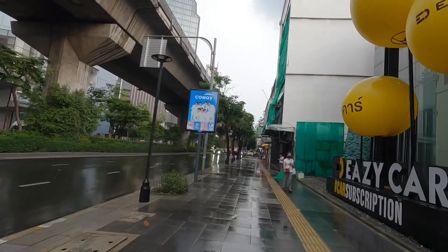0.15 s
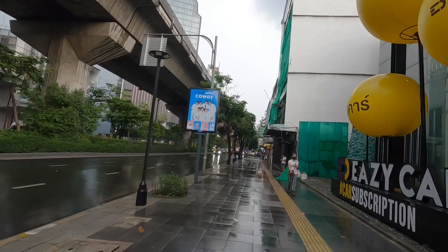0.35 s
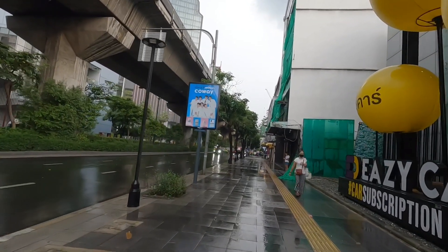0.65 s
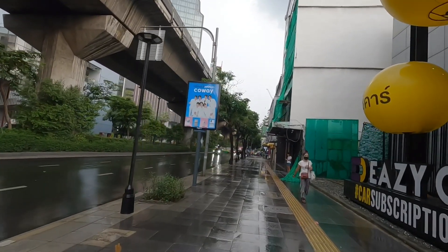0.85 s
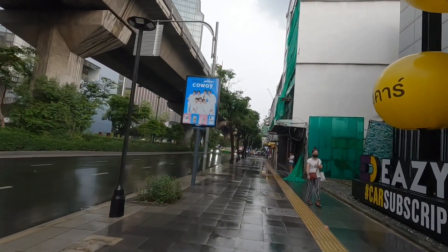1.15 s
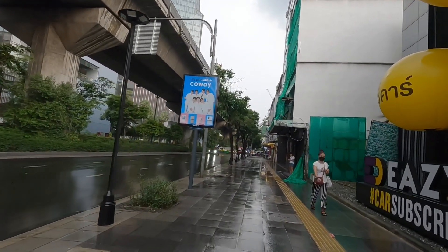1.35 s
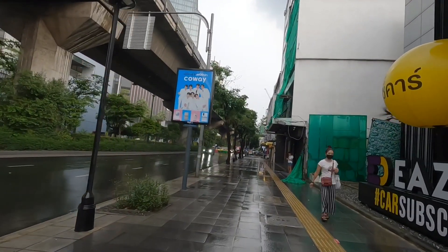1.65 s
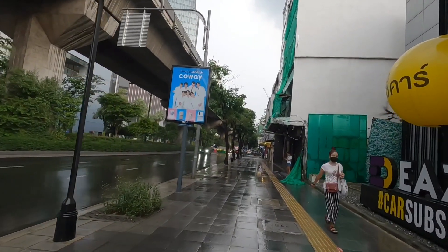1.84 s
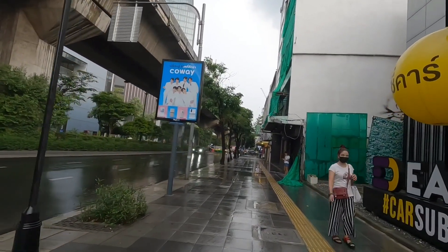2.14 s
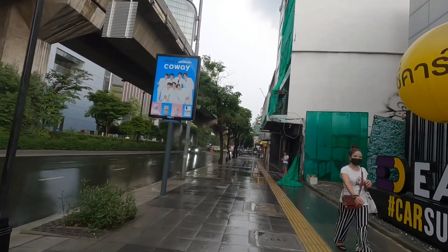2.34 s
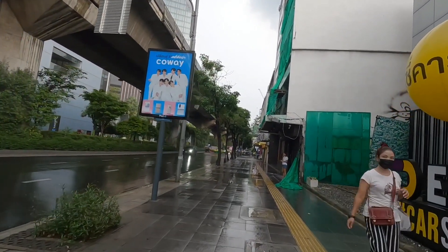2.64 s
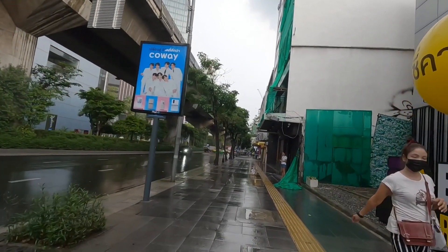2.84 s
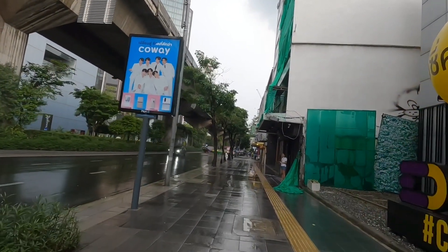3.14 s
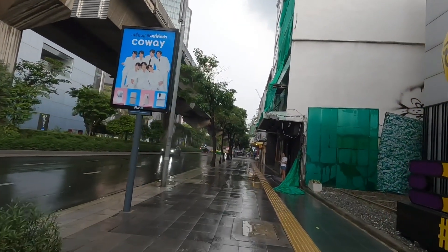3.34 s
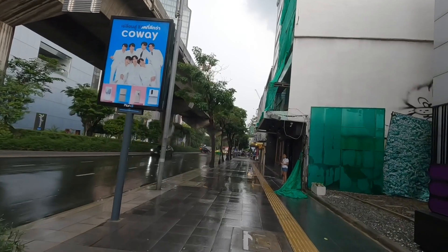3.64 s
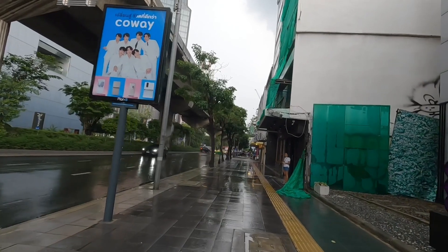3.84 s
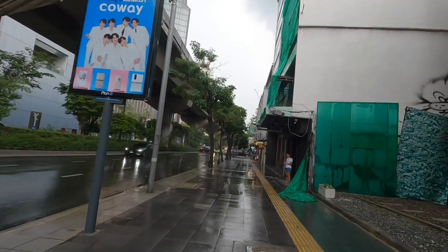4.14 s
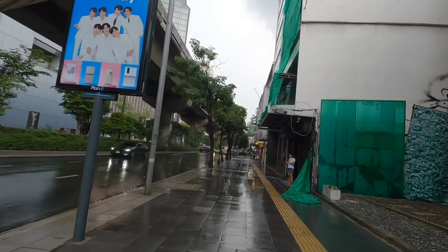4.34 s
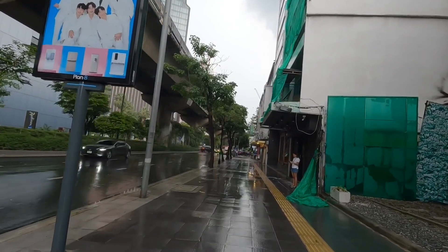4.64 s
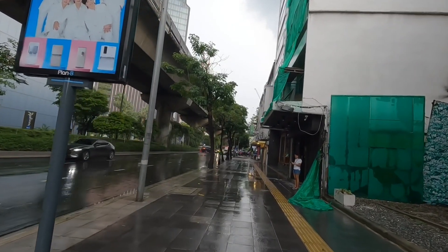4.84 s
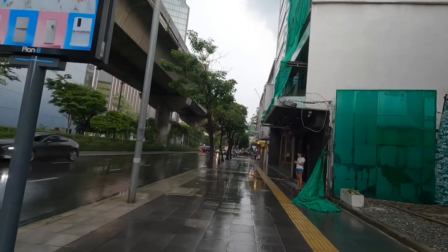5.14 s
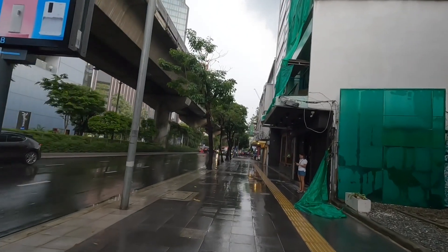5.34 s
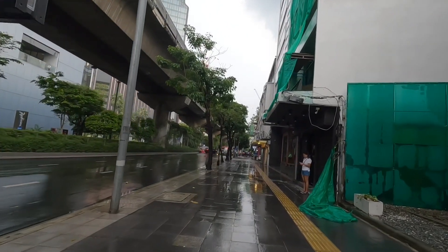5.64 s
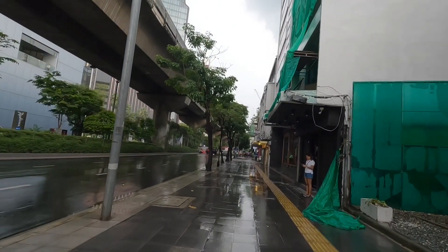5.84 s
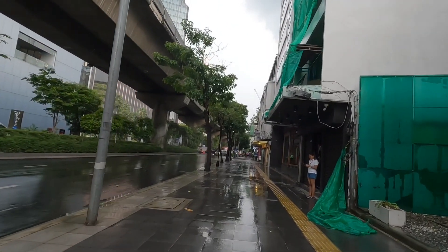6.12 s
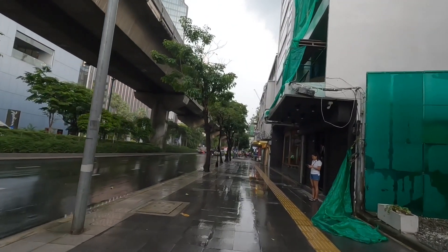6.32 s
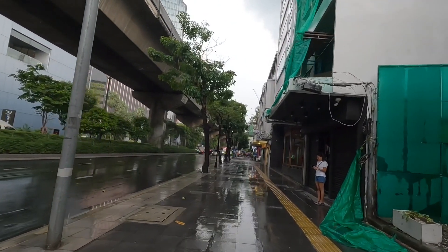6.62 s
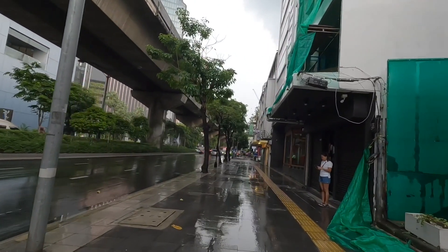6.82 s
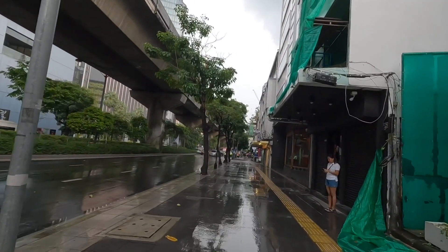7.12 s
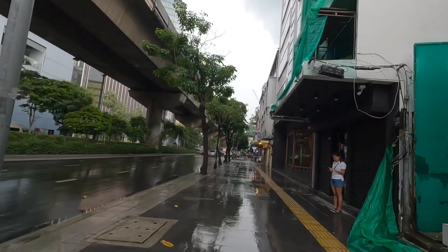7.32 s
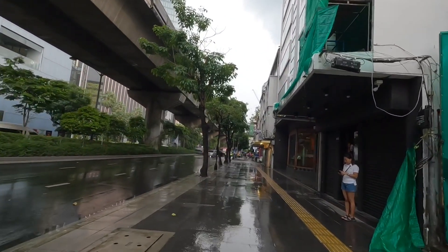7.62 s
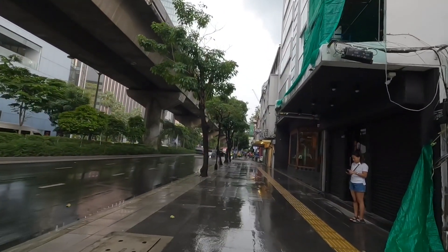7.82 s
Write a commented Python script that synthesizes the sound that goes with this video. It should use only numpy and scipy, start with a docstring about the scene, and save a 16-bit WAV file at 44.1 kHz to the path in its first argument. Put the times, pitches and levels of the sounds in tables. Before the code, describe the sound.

A wet city street, heard from the pavement on a small stereo camera microphone. A big engine drones steadily, with a low, buzzing, fluttering tone around 135 Hz; it surges at 0.1 and 0.8 seconds, again between 2.2 and 3.5, more weakly from 4.1 to 5.6, and strongest from 6.3 to the end at 8. A farther engine wavers slightly higher, swelling around 3.4, 4.3 and 6, then vanishing by about 6.3. Beneath lies deep traffic rumble. Cars pass at about 0, 2.3, 3.4, 4.1, 4.6, 5.5, 6.3, 6.8 and 8, each a soft tyre roar with watery spray and faint hiss. At 3.2 to 3.4 a faint high brake squeak stutters and sinks slightly. Low wind puffs bump the microphone from 2.2 to 4.6, strongest after 4. The stereo is widest around 3.3 to 4.2, narrow around 5.3 to 6.7, and widens again at the end.

```python
"""A big engine drones and surges over a wet city street: wavering sines at multiples of one cycle rate.
A farther engine is a single wavering tone. Shaped noise makes the traffic: rumble and growl below,
tyre roar, tread, spray and a faint hiss above, swelling as cars pass. Puffs of low noise are wind on the
microphone; a brake squeaks in a few short sine bursts. The picture drifts between nearly mono and stereo."""
import sys
import numpy as np
from scipy import signal
from scipy.io import wavfile
from scipy.ndimage import uniform_filter1d

SR = 44100
rng = np.random.default_rng(int(sys.argv[2]) if len(sys.argv) > 2 else 0)


def waveform_to_disk(signal):
    """Save audio, clipped to [-1, 1], as 16-bit WAV at the path in sys.argv[1]."""
    frames = np.transpose(np.atleast_2d(signal))
    scaled = np.clip(frames, -1, 1) * 32767
    samples = np.round(scaled).astype(np.int16)
    wavfile.write(sys.argv[1], SR, samples)


def amplitude_ratio(level_db):
    """Convert a level in decibels to the matching linear amplitude (field) ratio."""
    exponent = np.asarray(level_db, float) / 20
    return 10 ** exponent


N = 351466  # length in samples


def evened(x):
    """Scales to rms 1."""
    return x / np.sqrt(np.mean(x ** 2) + 1e-20)


def read(points, hz):
    """Reads a spectrum on a log-frequency axis."""
    f, value = np.transpose(points)
    return np.interp(np.log(hz + 1), np.log(f + 1), value)


def wander(length, hz):
    """Smoothed chance of rms about 1: white steps through a one-pole low-pass with its corner near hz."""
    step_rate = 40  # Hz
    steps = rng.standard_normal(int(length * step_rate / SR) + 50)
    smooth = signal.lfilter([1], [1, -np.exp(-2 * np.pi * hz / step_rate)], steps)
    return np.interp(np.arange(length) * step_rate / SR, np.arange(len(steps)), evened(smooth))


def swells(rows, rest_db):
    """Level in dB of bell-shaped swells whose power adds to a resting level."""
    t = np.arange(N) / SR
    bells = sum(amplitude_ratio(db) ** 2 * np.exp(-2 * ((t - s) / half) ** 2) for s, half, db in rows)
    return 10 * np.log10(amplitude_ratio(rest_db) ** 2 + bells)


def tone(hz, db, rough_db, rough_hz, waver=0.00602):
    """A sine whose level and pitch flutter, as echoes from the walls add and cancel."""
    fluttering_hz = hz * (1 + waver * wander(len(hz), rough_hz))
    turns = np.cumsum(fluttering_hz) / SR + rng.random()
    level = np.sqrt(2) * amplitude_ratio(db + rough_db * wander(len(hz), rough_hz))
    return level * np.sin(2 * np.pi * turns)


# The engine pulls: start t/s, length/s, firing level/dB at the start, firing level/dB at the end
PULLS = [(0.077, 0.58, -23.5, -18.5), (0.752, .2, -15.5, -20), (2.236, 0.19, -21.5, -21),
         (2.44, 0.56, -18, -18.5), (3.095, 0.435, -23.5, -24.5), (4.123, 0.19, -26.5, -25.5),
         (4.407, .35, -23, -24), (5.307, 0.33, -30.5, -24), (6.263, 0.87, -17.5, -14.5),
         (7.23, 0.63, -20, -14)]
IDLE_DB, PULL_RISE_S, PULL_FALL_S = -29.5, 0.036, 0.1


def load():
    """Firing level in dB: each pull sets in quickly, holds and lets go."""
    t = np.arange(N) / SR
    power = amplitude_ratio(IDLE_DB) ** 2
    for s, length, start_db, end_db in PULLS:
        held = amplitude_ratio(np.interp(t, [s, s + length], [start_db, end_db]))
        rise = np.clip((t - s) / PULL_RISE_S, 0, 1)
        fall = np.exp(-np.maximum(t - s - length, 0) / PULL_FALL_S)
        power = power + (held * rise * fall) ** 2
    return 10 * np.log10(power)


# Big engine speed: t/s, cycle rate f/Hz
ENGINE = [(0.0, 45.03), (0.351, 44.96), (0.84, 46.43), (1.499, 45.02), (2.22, 45.95), (2.48, 44.9),
          (2.949, 45.7), (3.51, 47.24), (3.86, 46.53), (4.11, 49.97), (4.46, 48.62), (4.7, 46.63),
          (5.59, 44.8), (6.15, 47), (6.352, 45.24), (6.8, 44.18), (7.3, 45.28), (7.75, 46.78), (7.97, 46.1)]
# Partials around the firing tone: multiple of the cycle rate, level/dB against the firing level
LOW_ORDERS = [(2, -16), (3, -1), (4, -16), (5, -28)]
# Partials around the firing tone's octave: multiple of the cycle rate, level/dB against the octave level
MID_ORDERS = [(6, -1.5), (7, -6.5)]
# Upper partials: multiple of the cycle rate, level/dB against the eighth multiple's level
HIGH_ORDERS = [(8, -1), (9, -7)]
# The octave swells: t/s, half length/s, level/dB
OCTAVE_SWELLS = [(.1, 0.7, -32), (2.9, 0.43, -37), (3.5, 0.3, -33), (4.65, 0.37, -30.5), (5.5, 0.39, -37),
                 (6.4, 0.1807, -32.5), (6.85, .15, -38), (7.65, 0.37, -31.5)]
# The eighth multiple swells: t/s, half length/s, level/dB
EIGHTH_SWELLS = [(4.3, 0.28, -49), (6.35, 0.14, -33), (6.75, .3, -38), (7.15, 0.14, -39), (7.6, .2, -37),
                 (7.9, 0.22, -31)]
OCTAVE_REST_DB, EIGHTH_REST_DB = -47, -47


def engine():
    """Multiples of one cycle rate; the third, the firing tone, stands out clean under load."""
    hz = np.interp(np.arange(N) / SR, *np.transpose(ENGINE))
    firing_db = load()
    octave_db = swells(OCTAVE_SWELLS, OCTAVE_REST_DB)
    eighth_db = swells(EIGHTH_SWELLS, EIGHTH_REST_DB)
    slack = np.clip((-17 - firing_db) / 9, 0, 1)  # off load the firing grows uneven
    low = sum(tone(k * hz, firing_db + db, rough_db=2.5 + 2.6 * slack, rough_hz=9.2,
                   waver=0.0049 + 0.012 * slack) for k, db in LOW_ORDERS)
    mid = sum(tone(k * hz, octave_db + db, rough_db=3.0 + 0.83 * slack, rough_hz=9.36,
                   waver=0.00664 + 0.00778 * slack) for k, db in MID_ORDERS)
    high = sum(tone(k * hz, eighth_db + db, rough_db=2.0 + 1.4 * slack, rough_hz=8.92,
                    waver=0.0056 + 0.00836 * slack) for k, db in HIGH_ORDERS)
    return low + mid + high


# A second, farther engine swells: t/s, half length/s, level/dB
FAR_SWELLS = [(.7, 0.26, -33.5), (1.5, 0.19, -37.5), (2.35, .25, -35), (3.35, 0.28, -30.5),
              (4.25, 0.43, -28.5), (4.9, 0.17, -32.5), (5.45, .15, -36.5), (5.95, 0.3, -28)]
FAR_HZ, FAR_REST_DB, FAR_GONE_S = 187, -46, 6.3


def far_engine():
    """One wavering tone that swells and, near the end, quickly fades out for good."""
    heard = np.clip((FAR_GONE_S - np.arange(N) / SR) / 0.1, 0, 1)
    hz = FAR_HZ * (1 + 0.01476 * wander(N, 1.41))
    return heard * tone(hz, swells(FAR_SWELLS, FAR_REST_DB), rough_db=3.5, rough_hz=11, waver=0.017)


# Left-right difference against the sum, in full stereo: f/Hz, level/dB
SIDE_DB = [(60, -20.5), (200, -22.5), (640, -11.5), (1400, -9.5), (3100, -5.5), (6800, -2.5), (10000, 0.5),
           (12000, -6.5), (15000, 3.5)]
# The road lies to the left: f/Hz, likeness of difference and sum [0 to 1]
LEAN = [(60, .15), (700, .45), (3000, .35), (6000, .4), (10000, .55), (12000, .05)]


def noise(spectrum, patchy_db, flicker_db):
    """Sum and difference of the two sides: random short-time spectra, drifting patches, shared flicker."""
    frames, hz = N // 256 + 6, np.fft.rfftfreq(1024, 1 / SR)
    a, b, c, d, patches = rng.standard_normal((frames, 513, 5)).T
    patches = uniform_filter1d(patches, size=12, axis=0)  # smooth over frequency
    patches = evened(uniform_filter1d(patches, size=14, axis=1))  # smooth over time
    flicker = evened(uniform_filter1d(rng.standard_normal(frames), size=3))
    lean = np.clip(read(LEAN, hz), -1, 1)[:, None]
    mid, unrelated = a + 1j * b, c + 1j * d
    side = amplitude_ratio(read(SIDE_DB, hz))[:, None] * (lean * mid + np.sqrt(1 - lean ** 2) * unrelated)
    level_db = read(spectrum, hz)[:, None] + patchy_db * patches + flicker_db * flicker
    out = signal.istft(np.array([mid, side]) * amplitude_ratio(level_db), nperseg=1024, noverlap=768)[1][:, :N]
    return out / np.sqrt(np.mean(out[0] ** 2))  # the sum gets rms 1


# Cars passing: nearest t/s, approach/s, leaving/s, tyre roar level/dB, spray level/dB
PASSES = [(0, .3, 0.9, -38.5, -49.5), (2.25, 0.63, 0.37, -37.5, -48.5), (3.36, 0.75, 0.29, -42.5, -46),
          (4.08, 0.42, 0.2, -38.5, -41), (4.6, 0.57, 0.5, -38, -61), (5.05, 0.18, 0.22, -42, -52.5),
          (5.499, 0.45, 0.49, -36, -41.5), (6.25, 0.44, 0.55, -36.5, -42), (6.8, 0.41, 0.082, -40.5, -46.5),
          (8.0, 0.4, .3, -39.5, -45.5)]
FALL_OFF = 1.27  # walls and parked cars shade a car, so it fades faster than the plain distance law (1)


def passing(column, far_db, leaving=1):
    """Level in dB of all cars: power falls with distance, before and after each pass."""
    t = np.arange(N) / SR
    power = amplitude_ratio(far_db) ** 2
    for row in PASSES:
        scale_s = np.where(t < row[0], row[1], leaving * row[2])
        power = power + amplitude_ratio(row[column]) ** 2 / (1 + ((t - row[0]) / scale_s) ** 2) ** FALL_OFF
    return 10 * np.log10(power)


# Spectra of the traffic layers, each f/Hz, relative level/dB per Hz:
# deep rumble and growl of engines
RUMBLE = [(15, -7), (25, 15.5), (45, 10.5), (75, 9), (110, 13), (150, 0), (220, -9.5), (600, -84.5)]
GROWL = [(100, -3.5), (160, -3), (200, 5), (300, 1.5), (400, -4.5), (430, -8), (500, -17), (1500, -67.5)]
# tyre roar, and air pumped in the tread of a near tyre
ROAR = [(250, -37), (450, -2), (700, -1), (1000, -3), (1500, -7), (2200, -12), (3500, -17.5), (9000, -52)]
TREAD = [(500, -39), (800, 1), (1000, 6), (1250, -3.5), (2000, -26), (4000, -69)]
# water thrown by the tyres
SPRAY = [(800, -16), (2000, -2), (3000, -3.5), (5000, -4.5), (7700, -9), (8500, -14.5), (9700, -25.5),
         (14000, -53)]
# a faint top hiss, differing per side
TOP_HISS = [(7000, -28), (9500, -3), (11500, -2), (13000, -11), (14800, -23), (15600, -27.5)]
# The deep rumble's slow rises and falls, weaker towards the end: t/s, half length/s, level/dB
RUMBLE_SWELLS = [(.1, 1, -21), (1.3, 0.94, -21.5), (2.4, 0.52, -23), (3.2, 0.42, -24.5), (4.1, 1, -22),
                 (5.2, 0.99, -23), (6.4, 0.76, -24.5), (7.3, 0.24, -25.5)]
RUMBLE_REST_DB = -25.5
FAR_ROAR_DB, FAR_SPRAY_DB = -37.5, -52  # tyres far down the street


def traffic():
    """Broad layers of noise: engines far off below, tyres on wet asphalt above, a faint hiss on top."""
    roar_db = passing(column=3, far_db=FAR_ROAR_DB)
    spray_db = passing(column=4, far_db=FAR_SPRAY_DB)
    # the top hiss follows the spray level more steeply and falls sooner
    hiss_db = -66.5 + 1.1 * (passing(column=4, far_db=FAR_SPRAY_DB, leaving=0.6) + 45)
    # the tread note grows faster than the roar as a car comes near
    tread_db = -43.0 + 4.5 * (roar_db + 34)
    rumble_db = swells(RUMBLE_SWELLS, RUMBLE_REST_DB)
    # exhausts come near with the tyres, with a slight drift of their own
    growl_db = -30 + (roar_db + 35) + 0.25 * wander(N, 2.5)

    engines = amplitude_ratio(rumble_db) * noise(RUMBLE, patchy_db=-1.05, flicker_db=0.93)
    engines += amplitude_ratio(growl_db) * noise(GROWL, patchy_db=1.8, flicker_db=0.0)
    tyres = amplitude_ratio(roar_db) * noise(ROAR, patchy_db=0.06, flicker_db=-0.13)
    tyres += amplitude_ratio(spray_db) * noise(SPRAY, patchy_db=-0.8, flicker_db=-0.4)
    tyres += amplitude_ratio(tread_db) * noise(TREAD, patchy_db=0.6, flicker_db=0.1)
    hiss = amplitude_ratio(hiss_db) * noise(TOP_HISS, patchy_db=0.3, flicker_db=0.4)
    mid, side = engines + tyres + hiss
    return np.array([mid + side, mid - side])


# Puffs of wind on the microphone ports: t/s, level/dB, length/s
PUFFS = [(2.244, -39, 0.087), (2.47, -38, 0.043), (2.79, -41, 0.039), (3.01, -31, 0.12),
         (3.655, -38.5, 0.2), (4.02, -27, 0.05), (4.125, -27.5, 0.042), (4.33, -28.5, 0.1),
         (4.56, -31, 0.062)]
PUFF_HZ = 198  # upper corner of the puffs


def wind():
    """Low lumps of noise, unrelated at the two ports."""
    t = np.arange(N) / SR
    gusts = sum(amplitude_ratio(db) * np.exp(-((t - s) / length) ** 2) for s, db, length in PUFFS)
    low_pass = signal.butter(2, PUFF_HZ, fs=SR, output="sos")
    high_pass = signal.butter(1, 0.37 * PUFF_HZ, "high", fs=SR, output="sos")
    band = np.vstack([low_pass, high_pass])
    return gusts * evened(signal.sosfilt(band, rng.standard_normal((2, N))))


# Brake squeak bursts: t/s, half length/s, level/dB
SQUEAKS = [(3.222, .014, -44), (3.245, .014, -43), (3.272, .012, -44), (3.295, .014, -44),
           (3.345, .016, -42), (3.39, .03, -52)]
SQUEAK_HZ, SQUEAK_SAG_HZ_PER_S = 3120, 350


def squeak():
    """A brake pad sings in short bursts, sinking in pitch."""
    since = np.clip(np.arange(N) / SR - SQUEAKS[0][0], -1, 1)  # seconds from the first burst
    hz = SQUEAK_HZ - SQUEAK_SAG_HZ_PER_S * since
    return tone(hz, swells(SQUEAKS, -120), rough_db=5.0, rough_hz=15, waver=0.0019)


def scene():
    """Traffic and wind, with the tonal sources a little left of centre."""
    def panned(sound, left_db):
        """Raises the left and lowers the right by left_db."""
        return sound * amplitude_ratio(np.array([[left_db], [-left_db]]))

    tones = panned(engine(), 0.4) + panned(far_engine(), 0.8) + panned(squeak(), 0.6)
    return tones + traffic() + wind()


def roll_off(x):
    """The treble ends steeply here."""
    return signal.sosfilt(signal.butter(12, 15610, fs=SR, output="sos"), x)


# The camera's stereo width, before the factor below: t/s, side level/dB
WIDTH = [(0, -13.5), (1.15, -8.5), (1.4, -14), (1.65, -9), (2.2, -5), (3.3, -1), (4.15, -0.5), (4.65, -8.5),
         (5.3, -13.5), (6.7, -13.5), (7.0, -8), (7.6, -5), (7.97, -2.5)]
# Factor on the width's dB, largest near 700 Hz, smaller upward, none above 11 kHz: f/Hz, factor
WIDTH_FACTOR = [(100, 2.5), (700, 3), (2500, 2), (6000, 1.5), (10300, 1.4), (11200, 0)]
# How the mono picture differs in tone: f/Hz, level/dB
MONO_COLOUR = [(300, 0), (1000, -0.9), (4000, -0.5), (7000, -5), (10000, -2.5), (13000, 3.5), (15600, 3)]
KNEE = 0.7  # the ceiling towards which the input flattens peaks (full scale 1)


def record(dry):
    """The camera drifts between mono and stereo, changing tone with the width; loud peaks are rounded."""
    mid_side = np.array([dry[0] + dry[1], dry[0] - dry[1]]) / 2
    hz, t, (mid, side) = signal.stft(mid_side, SR, nperseg=1024)
    s, db = np.transpose(WIDTH)
    width_db = np.interp(t, s, db)
    mono_share = 1 - np.clip(amplitude_ratio(width_db), 0, 1)
    colour = amplitude_ratio(read(MONO_COLOUR, hz)[:, None] * mono_share)
    side = side * amplitude_ratio(read(WIDTH_FACTOR, hz)[:, None] * width_db)
    left_right = colour * np.array([mid + side, mid - side])
    pair = signal.istft(left_right, SR, nperseg=1024)[1][:, :N]
    return roll_off(KNEE * np.tanh(pair / KNEE))


dry = scene()
out = record(dry)
waveform_to_disk(out)
```